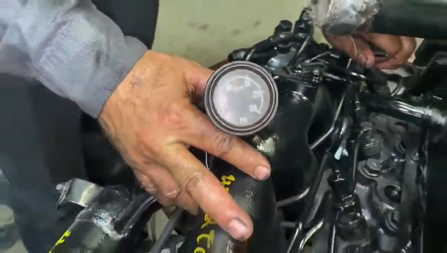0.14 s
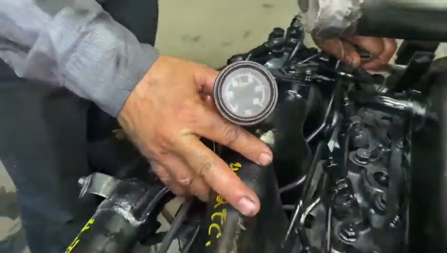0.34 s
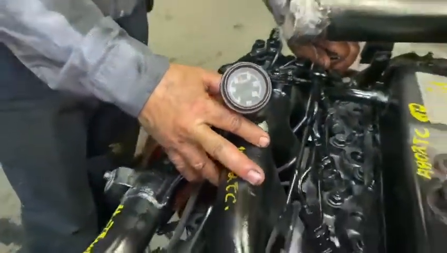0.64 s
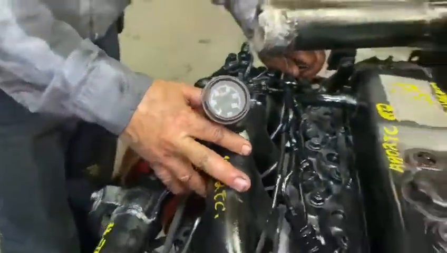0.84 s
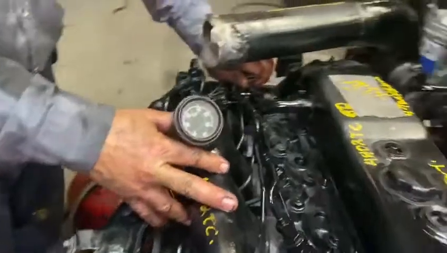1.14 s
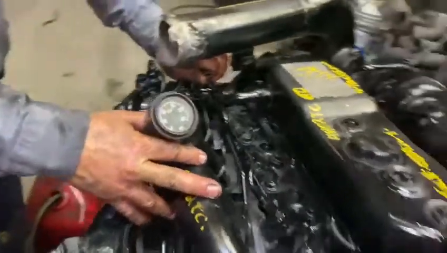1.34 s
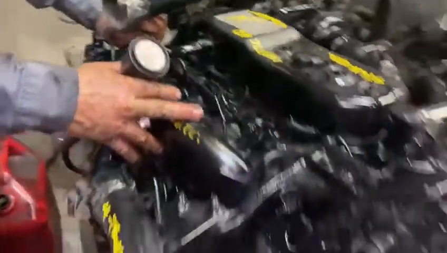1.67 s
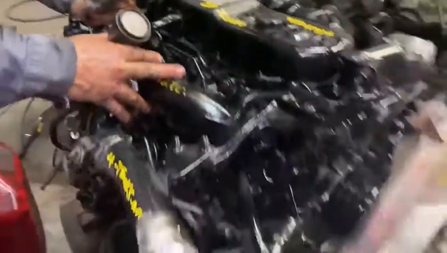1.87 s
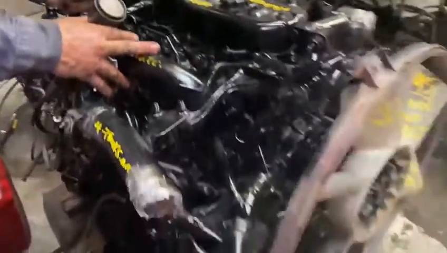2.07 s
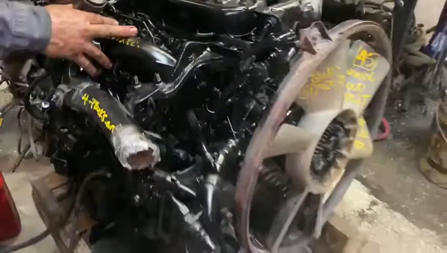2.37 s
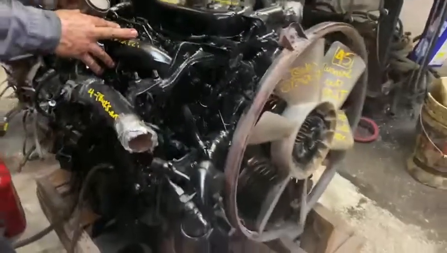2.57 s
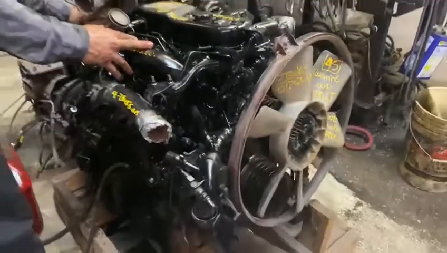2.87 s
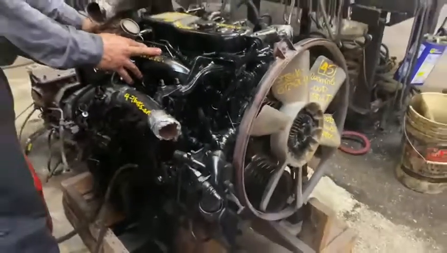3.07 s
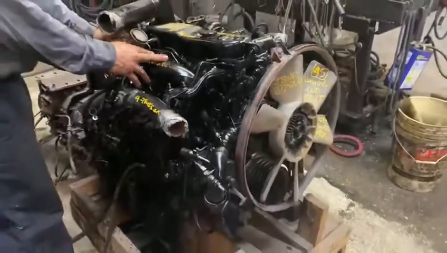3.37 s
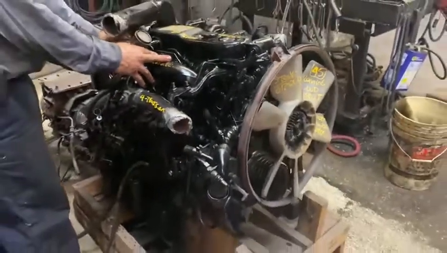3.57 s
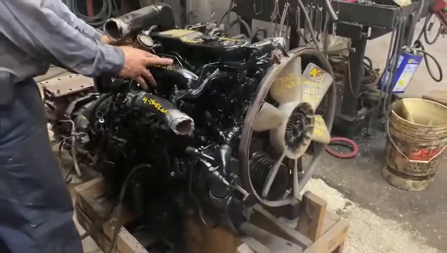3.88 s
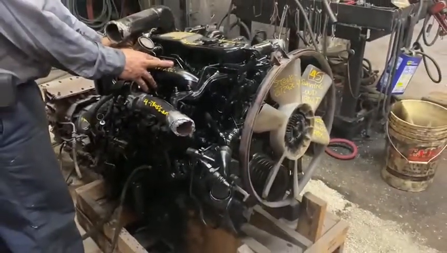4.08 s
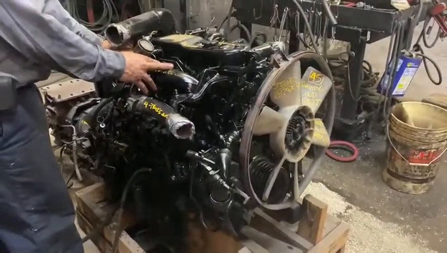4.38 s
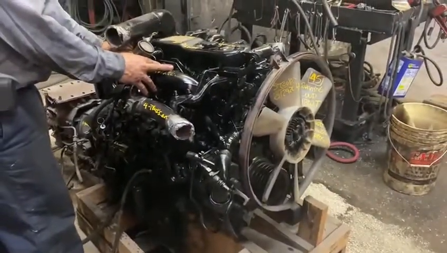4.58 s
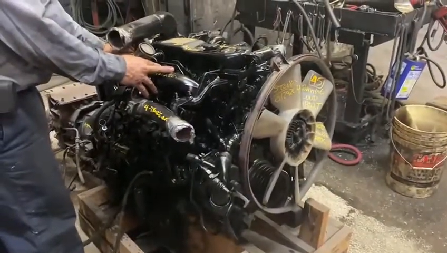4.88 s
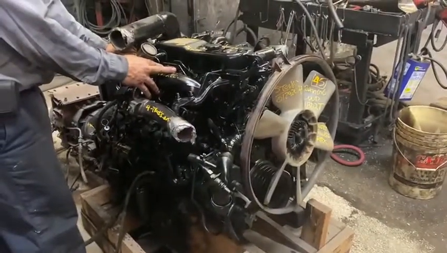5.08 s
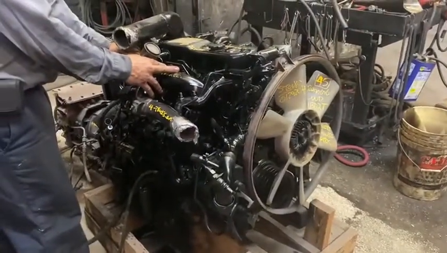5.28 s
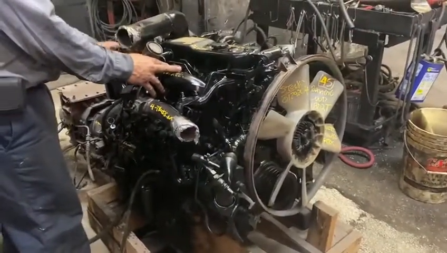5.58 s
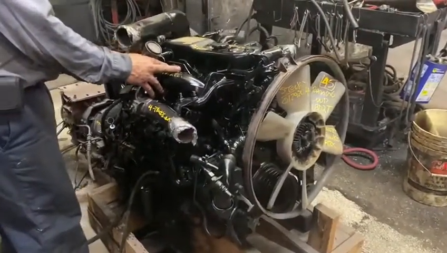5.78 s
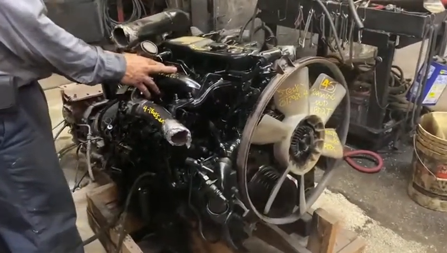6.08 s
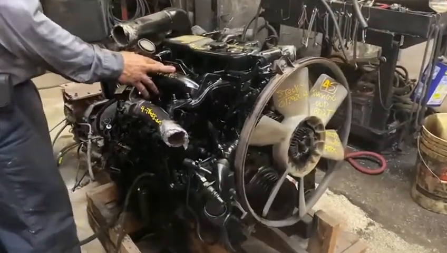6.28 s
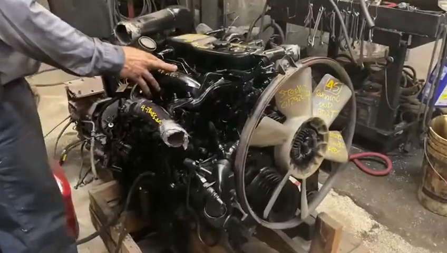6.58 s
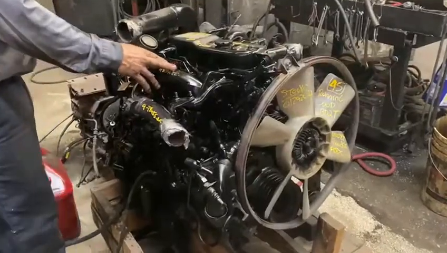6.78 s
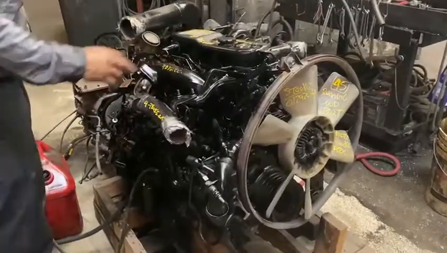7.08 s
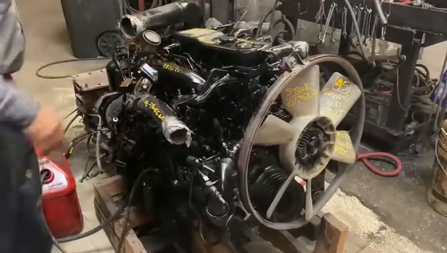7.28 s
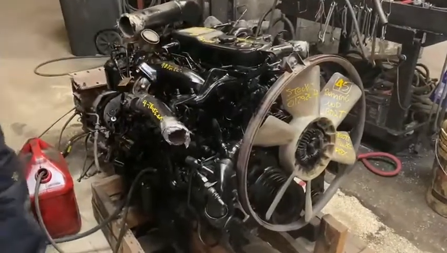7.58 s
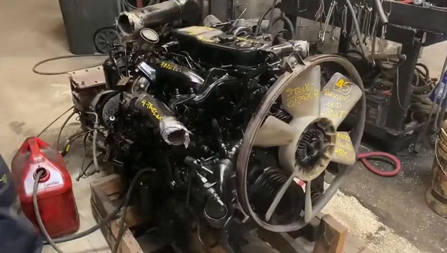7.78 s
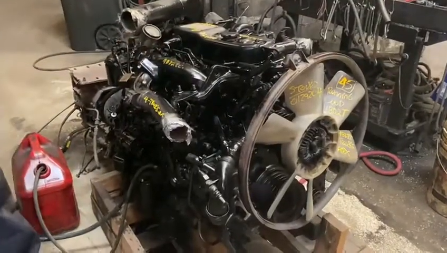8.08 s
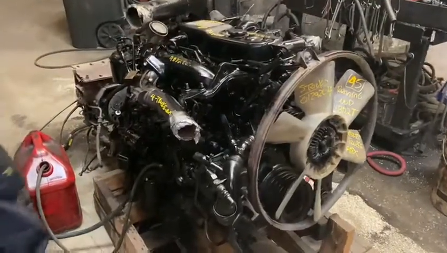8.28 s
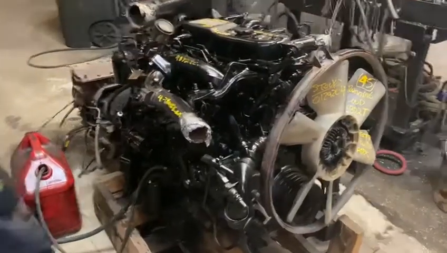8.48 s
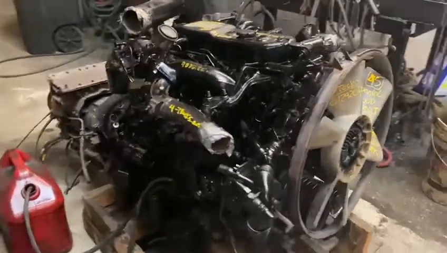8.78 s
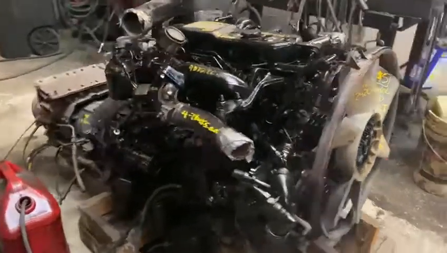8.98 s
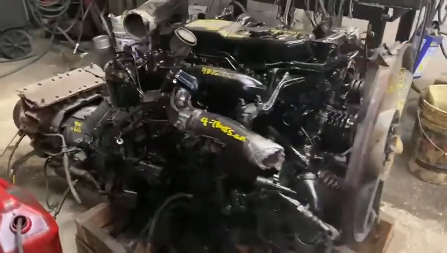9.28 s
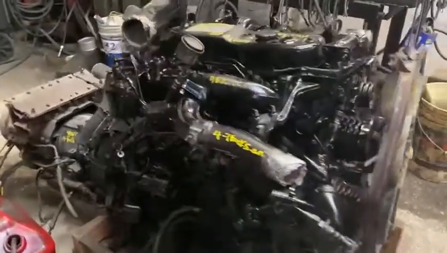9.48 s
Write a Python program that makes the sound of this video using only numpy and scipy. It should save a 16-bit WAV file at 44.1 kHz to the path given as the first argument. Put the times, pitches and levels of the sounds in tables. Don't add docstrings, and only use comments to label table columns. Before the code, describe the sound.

From 0 s a four-cylinder diesel runs fast, about 54 firings per second, a dense buzzing roar with bright metallic clatter close to the microphone. Around 1 s it is blipped, climbing rapidly to about 80 firings per second at 1.7 s, with harder exhaust snaps and a rough midrange bark. It drops back to about 53 by 2.5 s, lingers briefly, then sags from 3 to 4 s, the roar thinning into separate beats. It settles near 30, reaching a steady 28 by 5 s. Until the end near 9.6 s it idles lumpily: unequal low thumps in the open pipe, ringing block, gritty injector knock and valve rattle over soft gear, belt and fan wash. The handheld stereo pickup moves away from the head, then gradually closer from 6 s, the idle growing louder. Short workshop reflections; slightly gated treble, little above 12 kHz.

```python
import sys
import numpy as np
from scipy import signal
from scipy.fft import rfft, irfft, next_fast_len
from scipy.io import wavfile
from scipy.ndimage import uniform_filter1d

SR = 44100
rng = np.random.default_rng(int(sys.argv[2]) if len(sys.argv) > 2 else 0)


def volts_from_decibels(level):
    exponent = np.asarray(level, float) / 20
    return 10 ** exponent


def unload_audio(sound):
    columns = np.transpose(np.atleast_2d(sound))
    steps = np.round(np.clip(columns, -1, 1) * 32767)
    wavfile.write(sys.argv[1], SR, steps.astype(np.int16))


N = 425124
TIME = np.arange(N) / SR

# (time [s], rate [firings/s])
SPEED = [(0.0, 53.97), (0.93, 54.34), (1.22, 60.95), (1.57, 76.95), (1.7, 80.69), (1.85, 75.53),
         (2.0, 67.16), (2.3, 55.97), (2.48, 53.06), (2.92, 51.36), (3.32, 43.05), (3.91, 34.9),
         (4.13, 31.67), (4.85, 30.36), (5.0, 28.13), (8.48, 28.11), (9.11, 28.38), (9.65, 28.07)]
FIRST_FIRING = .053
IDLE_PER_S = 28

PUSH_IDLE = [(0.056, 0.066), (0.021, 0.12), (0.23, 0.046), (0.2, 0.056)]
PUSH_FAST = [(0.1, 0.45), (0.24, 0.41), (0.093, 0.4), (0.16, 0.5)]
# (frequency [Hz], width [Hz], level [dB])
PIPE = [(78.2, 33, 9.5), (136, 99, 2.5), (253, 140, -18)]

# (frequency [Hz], width [Hz], level from cylinders 1, 2, 3, 4 [dB each])
BLOCK_IDLE = [(299.8, 8.2, -11.5, -0.5, -3.5, -3.5), (362, 55, -22.5, -57, 2.5, -4),
              (427, 22, -13, -59.5, -7.5, -0.5), (567, 96, -15, -23, 5.5, 1),
              (648, 25, -11.5, -2.5, -6.5, -14), (765, 36, -5, 7, -18, -1.5), (1265, 100, -1, 0, 6.5, 5.5),
              (1935, 170, -14, -30, 12, 2.5), (2733, 194, -14, -2, 9, -12), (3323, 140, -1, -38, 6.5, -18),
              (938, 47, -29, -4.5, -1.5, -7)]
BLOCK_FAST = [(308.6, 33.4, -15, -5.5, -22, 6), (350.6, 24, 0, -27, -4.5, -5),
              (410, 31, 0.5, -4.5, 3.5, 2.5), (433, 24, -23, -3, 2.5, -0.5),
              (484.4, 42.5, -3.5, -7.5, 3, -9), (530, 21.6, 0.5, -11, -1.5, -5), (581.6, 61, 8, -5, 8, 7.5),
              (754, 130, 5, 1, 9.5, 4.5), (970, 410, -9, -20, 16, -14), (1360, 1000, -21, -46, -20, -16)]
# (frequency [Hz], growth [dB per doubling of speed])
ROAR = [(300, -1), (412, 9), (540, -2.5), (760, 7.5), (950, 21), (1400, 0)]
ROAR_FROM_PER_S = 53.6
ROAR_ROUGH = 6

# (multiple, level under the pipe up to the fifth, under the block above it [dB])
HUM = [(3, -12), (4.5, -25), (7.5, -7), (7.75, -7), (9, -8)]
# (frequency [Hz], level [dB])
SING = [(300, 0), (370, -14), (400, 0), (430, 0), (455, -12), (487, 0), (530, -20), (700, -30)]
THROB_AT = 2.9

# (frequency [Hz], level [dB per Hz])
CLATTER_IDLE = [(500, -4.5), (1000, -12.5), (2000, 1.5), (3300, 1), (4500, -5.5), (7000, -10), (10300, -13),
                (11500, -20), (12300, -52)]
CLATTER_FAST = [(500, 3.5), (1000, -8), (2000, -4), (3800, -9.5), (5500, -9.5), (7000, -10.5), (10300, -16),
                (11500, -10.5), (12300, -73)]
KNOCK_IDLE_DB = [-8, -4, 0, -5]
KNOCK_FAST_DB = [-6, -2.5, 0, -11]

# (frequency [Hz], level [dB per Hz])
WASH = [(30, 20), (60, 16.5), (150, 16), (300, 9.5), (550, 9), (1000, 5.5), (2000, -0.5), (4000, -7.5),
        (7000, -12), (10300, -15), (11500, -17), (12300, -63)]

# (frequency [Hz], decay by 60 dB [s])
ROOM_DB = [(60, -22), (250, -17), (570, -11), (1500, -7), (7000, -10)]
ROOM_T60 = [(100, .4), (1000, .3), (8000, .15)]

# (frequency [Hz], left over right [dB])
PORT_PHASE = [(0, 0), (430, 0), (950, .95), (1600, 0), (2300, 0), (2950, 1.5), (3900, .2), (6000, 0)]
PORT_BALANCE = [(60, -1.2), (300, -1.8), (700, -2.8), (1200, -.5), (2500, .4), (5200, 2.2), (6500, .3),
                (9000, 0)]
# (frequency [Hz], level over the shared noise [dB])
SCATTER_DB = [(60, -22), (250, -15), (570, -7), (900, -3), (1500, 2), (2150, -3), (3300, 2), (4200, -2),
              (5500, 2), (7000, 0)]
# (frequency [Hz], sum [dB], difference [dB])
STEREO_BANDS = [(5600, 0, 0), (6300, 1, -12), (7000, 1, -10), (7650, -2, 2), (7950, -28, 5), (8800, -28, 5),
                (9050, -2, 2), (9500, 1, -16), (10500, 1, -16), (10900, -2, 2), (11200, -28, 5)]
# (time [s], nearness to the engine [dB], extra nearness to the cylinder head [dB])
HAND = [(0, -1, 9), (.4, -1, 7), (.9, -0.5, 3), (1.3, 1.5, -3), (1.7, 1, 0), (2.2, 0, 1), (2.7, -1, -2.5),
        (3.05, -1, -2.5), (3.3, -2.5, 0), (3.9, -1, -1.5), (4.5, 0.5, -2), (5.2, 0.5, -0.5),
        (6.5, 2.5, -0.5), (8.2, 4, -0.5), (9.0, 5, 1.5), (9.64, 6, 2.5)]

# (level at idle [dB], growth [dB per doubling of speed], share of the head's nearness)
PIPE_LAW = (-30.5, 12.46, 0.13)
BLOCK_LAW = (-39.5, 13.53, 0.53)
CLATTER_LAW = (-44.5, 10.16, 0.7)
WASH_LAW = (-47.5, 11.1, 0.018)
SNAP_DB, SNAP_FULL_PER_S, SURGE_S = 21.5, 0.9, 0.64
FUEL_DB, BLOCK_FUEL_DB = 3, 0.5


def read(points, hz):
    f, value = np.transpose(points)
    return np.interp(np.log(hz + 1), np.log(f + 1), value)


def coloured(x, gain):
    size = next_fast_len(N + 8192)
    return irfft(rfft(x, size) * gain(np.fft.rfftfreq(size, 1 / SR)), size)[..., :N]


def levelled(x, db):
    power = uniform_filter1d(uniform_filter1d(x ** 2, size=9000), size=9000)
    return volts_from_decibels(db) * x / np.sqrt(abs(power) + 1e-20)


def train(at_s, sizes):
    at = np.round(at_s * SR).astype(int)
    keep = (at >= 0) & (at < N)
    return np.bincount(at[keep], sizes[keep], N)


def engine_speed():
    return np.interp(TIME, *np.transpose(SPEED))


def firing_count():
    return FIRST_FIRING + np.cumsum(engine_speed()) / SR


def firings():
    rate, turns = engine_speed(), firing_count()
    number = np.arange(int(turns[-1]) + 2)
    known_turns = np.r_[turns[0] - 1, turns, turns[-1] + 1]
    known_s = np.r_[-1 / rate[0], TIME, TIME[-1] + 1 / rate[-1]]
    s = np.interp(number, known_turns, known_s)
    hz = np.interp(s, TIME, rate)
    return s, hz, number % len(PUSH_IDLE), np.clip((hz - 30) / 20, 0, 1)


def pipe(s, hz, cylinder, fast, snap_db):
    mix = fast[:, None]
    sizes = np.array(PUSH_IDLE)[cylinder] * (1 - mix) + np.array(PUSH_FAST)[cylinder] * mix
    sizes = sizes * volts_from_decibels(.5 * rng.standard_normal((len(s), 2)))
    push_s = s + 0.01548 - 0.338 / hz
    snap_s = push_s + (.13 - 0.3 * fast) / hz

    def pulses(at_s, size, width_s):
        return coloured(train(at_s, size), lambda f: np.exp(-(2 * np.pi * f * width_s) ** 2 / 2))

    def modes(f):
        return sum(volts_from_decibels(db) * 1j * f * width / (peak ** 2 - f ** 2 + 1j * f * width)
                   for peak, width, db in PIPE)

    push = pulses(push_s, sizes[:, 0], .0023)
    snap = pulses(snap_s, sizes[:, 1], .0017)
    return coloured(push + volts_from_decibels(snap_db) * snap, modes)


def block(s, hz, cylinder):
    t, out = np.arange(8000) / SR, np.zeros(N)
    fast = np.clip((hz - 28.5) / 6, 0, 1)
    revs = np.log2(hz / ROAR_FROM_PER_S)
    rough = 1 + ROAR_ROUGH * np.maximum(revs, 0)
    idle = BLOCK_IDLE, 1 - fast, -.005, .0003, 1.5, False
    revved = BLOCK_FAST, fast, -.002, .00005, .8, True
    for modes, share, lag_s, jitter_s, scatter_db, roars in (idle, revved):
        for peak, width, *by_cylinder_db in modes:
            chance = rng.standard_normal((len(s), 2))
            ring = np.exp(-np.pi * width * t) * (1 - np.exp(-t / 0.0013)) * np.sin(2 * np.pi * peak * t)
            strike_db = np.array(by_cylinder_db)[cylinder] + scatter_db * chance[:, 0]
            if roars:
                strike_db = strike_db + np.maximum(revs, -.15) * read(ROAR, peak)
            strike_s = s + lag_s + jitter_s * rough * chance[:, 1]
            out += signal.oaconvolve(train(strike_s, share * volts_from_decibels(strike_db)), ring)[:N]
    return out


def hum(pipe_db, block_db):
    rate, out = engine_speed(), np.zeros(N)
    angle = 2 * np.pi * (firing_count() - THROB_AT)
    for multiple, db in HUM:
        waver_db = 2.5 * np.interp(TIME, np.linspace(0, TIME[-1], num=60), rng.standard_normal(60))
        under_db = block_db if multiple > 5 else pipe_db
        out += volts_from_decibels(under_db + db + waver_db + read(SING, multiple * rate)) * np.cos(multiple * angle)
    return out * np.clip((rate - 38) / 14, 0, 1)


def clatter(s, cylinder, fast):
    out, t = np.zeros((3, N)), np.arange(2500) / SR
    idle = CLATTER_IDLE, KNOCK_IDLE_DB, 1 - fast, -.0065, .005
    revved = CLATTER_FAST, KNOCK_FAST_DB, fast, -.004, .0035
    for colour, knock_db, share, lag_s, decay_s in (idle, revved):
        chance = rng.standard_normal((len(s), 3))
        sizes = share * volts_from_decibels(np.array(knock_db)[cylinder] + 1.0 * chance[:, 0])
        hits = train(s + lag_s + .0004 * chance[:, 1], sizes)
        hits += train(s + lag_s + 0.0048 + 0.0032 * chance[:, 2], .5 * sizes)
        burst = (1 - np.exp(-t / 0.0029)) * np.exp(-t / decay_s)
        shape = signal.oaconvolve(hits, burst)[:N]
        crackle_db = 7.0 * uniform_filter1d(rng.standard_normal(N), size=30)
        grit = rng.standard_normal((3, N)) * volts_from_decibels(crackle_db)
        out += coloured(shape * grit, lambda f: volts_from_decibels(read(colour, f)))
    return out


def wash():
    frames, hz = N // 128 + 8, np.fft.rfftfreq(512, 1 / SR)
    patches = rng.standard_normal((frames, len(hz))).T
    patches = uniform_filter1d(uniform_filter1d(patches, size=8, axis=0), size=10, axis=1)
    flicker = uniform_filter1d(rng.standard_normal(frames), size=2)
    white = rng.standard_normal((3, frames * 128))
    z = signal.stft(white, nperseg=512, noverlap=384)[2][..., :frames]
    z = z * volts_from_decibels(1.74 * patches / patches.std() + 1.23 * flicker * (hz[:, None] > 900))
    noise = signal.istft(z, nperseg=512, noverlap=384)[1][:, :N]
    noise = coloured(noise, lambda f: volts_from_decibels(read(WASH, f)))
    upper = coloured(noise[0], lambda f: (f > 1500) & (f < 7500))
    return noise / upper.std()


def workshop(x):
    taps = np.zeros((2, SR // 2))
    at = np.arange(40, SR // 2 - 20, 20) + rng.integers(0, 20, (2, (SR // 2 - 41) // 20))
    np.put_along_axis(taps, at, rng.choice([-1., 1.], at.shape), 1)
    hz, t, z = signal.stft(taps, SR, nperseg=256)
    z = z * volts_from_decibels(-60 * t / read(ROOM_T60, hz)[:, None])
    z /= np.sqrt((abs(z) ** 2).sum(2, keepdims=True))
    tail = signal.istft(z, SR, nperseg=256)[1]
    wet = signal.fftconvolve(x[None], tail / np.linalg.norm(tail[0]), axes=1)[:, :N]
    return coloured(wet, lambda f: volts_from_decibels(read(ROOM_DB, f)))


def loudness():
    octaves = np.log2(engine_speed() / IDLE_PER_S)
    s, *columns = np.transpose(HAND)
    near_db, head_db = (np.interp(TIME, s, c) for c in columns)

    def fader(idle_db, slope_db, share):
        return idle_db + slope_db * octaves + near_db + share * head_db

    surge = np.gradient(octaves) * SR * np.log(2)
    span = int(SURGE_S * SR)
    fuel = uniform_filter1d(surge, size=span)
    block_db = fader(*BLOCK_LAW) + BLOCK_FUEL_DB * fuel
    clatter_db = fader(*CLATTER_LAW) + FUEL_DB * fuel
    snap_db = SNAP_DB * np.tanh(uniform_filter1d(abs(surge), size=span) / SNAP_FULL_PER_S)
    return fader(*PIPE_LAW), block_db, clatter_db, fader(*WASH_LAW), snap_db


def scene():
    pipe_db, block_db, clatter_db, wash_db, snap_db = loudness()
    s, hz, cylinder, fast = firings()
    noisy = levelled(clatter(s, cylinder, fast), clatter_db) + wash() * volts_from_decibels(wash_db)
    engine = levelled(pipe(s, hz, cylinder, fast, snap_db), pipe_db)
    engine += levelled(block(s, hz, cylinder), block_db)
    engine += noisy[0] + hum(pipe_db, block_db)
    own = coloured(noisy[1:], lambda f: volts_from_decibels(read(SCATTER_DB, f)))
    side = np.array([[.5], [-.5]])
    direct = coloured(engine, lambda f: np.exp(1j * side * np.interp(f, *np.transpose(PORT_PHASE))))
    return coloured(direct + own + workshop(engine), lambda f: volts_from_decibels(side * read(PORT_BALANCE, f)))


def band_limit(x):
    return signal.sosfilt(signal.butter(12, 12240, fs=SR, output="sos"), x)


def record(dry):
    f, t, z = signal.stft([dry[0] + dry[1], dry[0] - dry[1]], SR, nperseg=1024, noverlap=768)
    treble = f > 3000
    shift, depth = uniform_filter1d(rng.standard_normal((2, len(t))), size=4)
    hz, *comb_db = np.transpose(STEREO_BANDS)
    comb = np.array([np.interp(f[:, None] * (1 + .03 * shift), hz, c) for c in comb_db])
    hiss_db = 10 * np.log10((abs(z[0, treble]) ** 2).mean(0) + 1e-20)
    knock_db = uniform_filter1d(hiss_db, size=5) - uniform_filter1d(hiss_db, size=60)
    comb *= np.where(comb < -8, np.clip(1.3 + .5 * depth - .35 * knock_db, .15, 2), 1)
    thinning = uniform_filter1d(uniform_filter1d(rng.standard_normal(z.shape), size=7, axis=1), size=7, axis=2)
    hollow = (thinning > 2.0 * thinning.std()) & treble[:, None]
    z = z * volts_from_decibels(comb - 36 * hollow)
    both, apart = signal.istft(z, SR, nperseg=1024, noverlap=768)[1][:, :N] / 2
    rumble_cut = signal.butter(4, 45, "high", fs=SR, output="sos")
    x = signal.sosfilt(rumble_cut, [both + apart, both - apart])
    x = x / (1 + abs(x / .97) ** 8) ** (1 / 8)
    return band_limit(x)


dry = scene()
out = record(dry)
unload_audio(out)
```